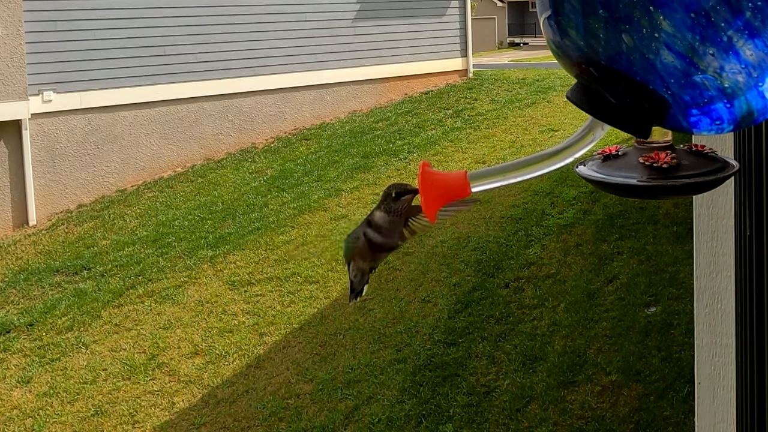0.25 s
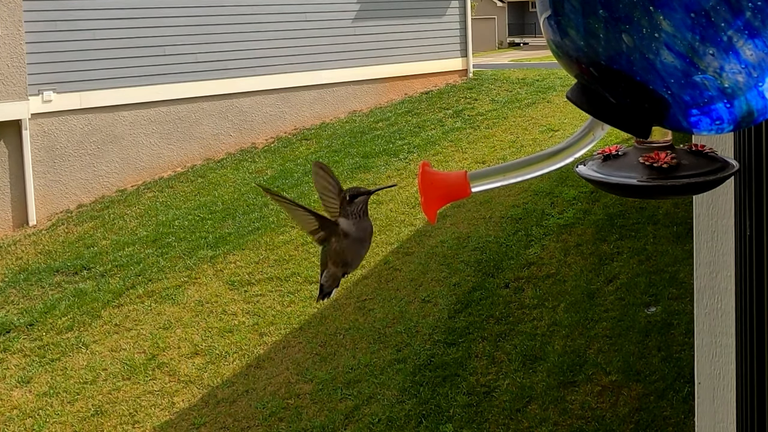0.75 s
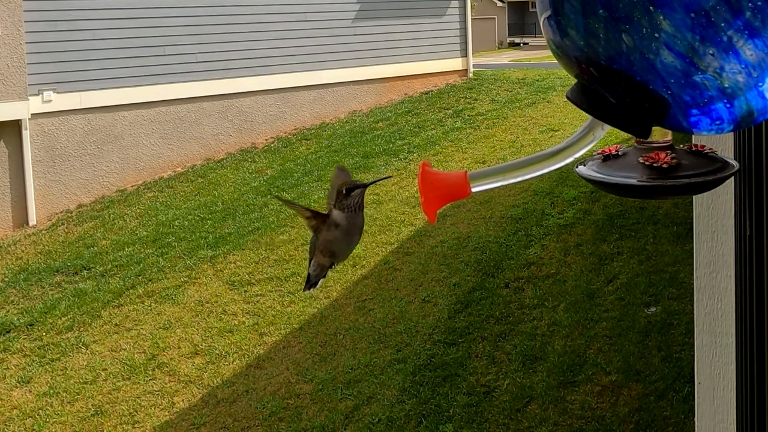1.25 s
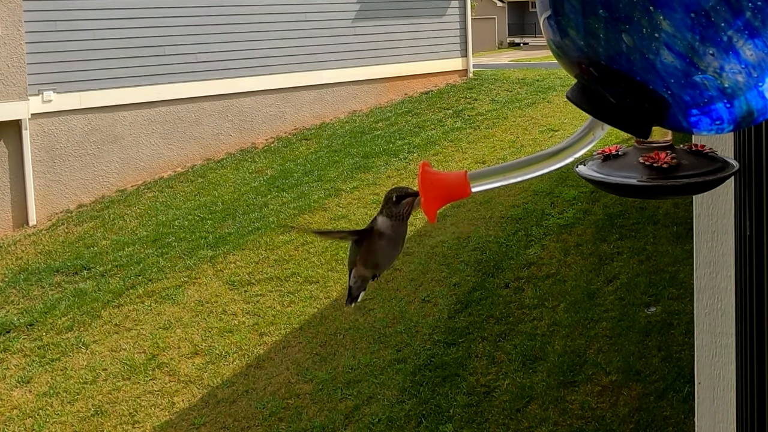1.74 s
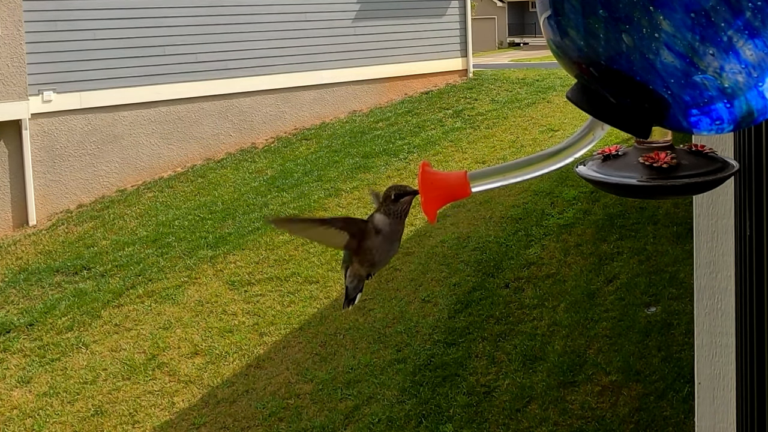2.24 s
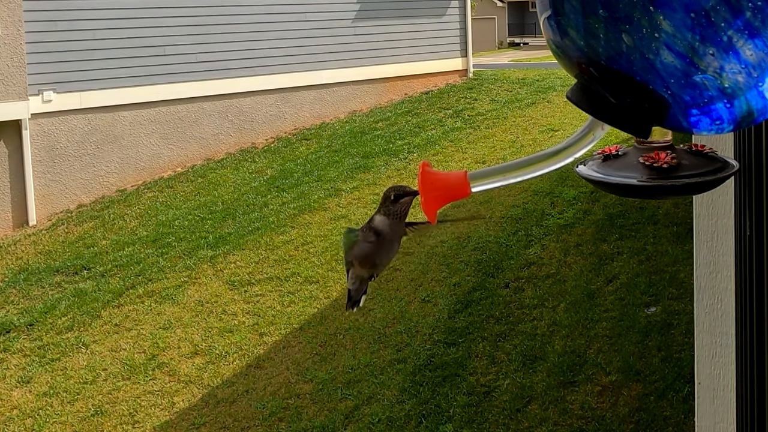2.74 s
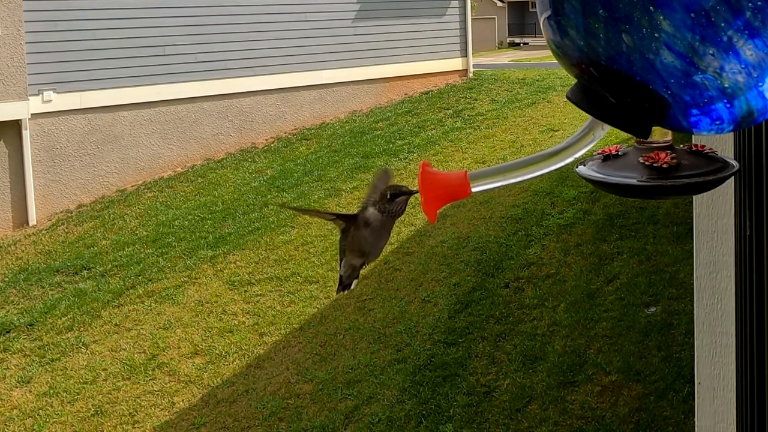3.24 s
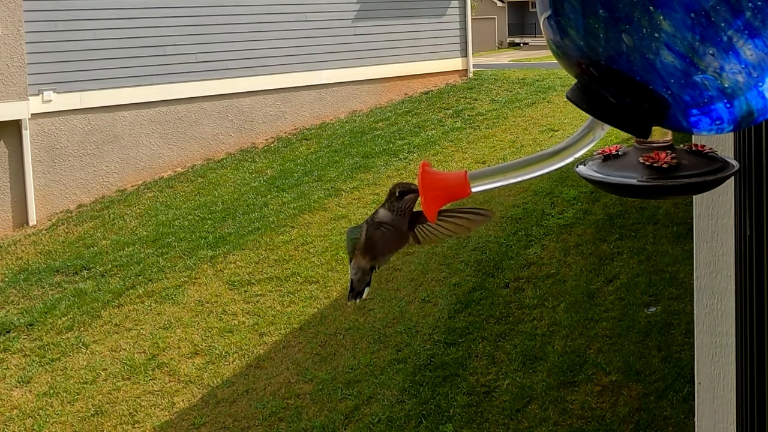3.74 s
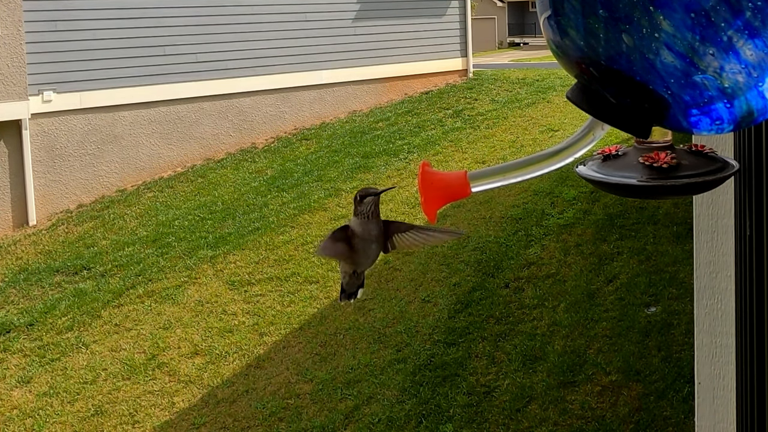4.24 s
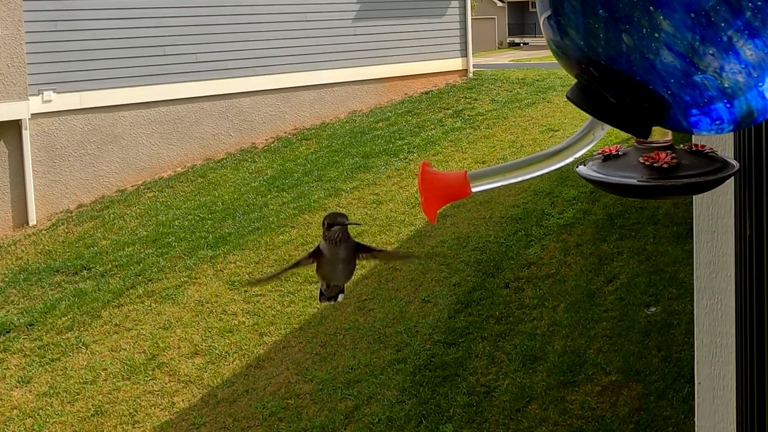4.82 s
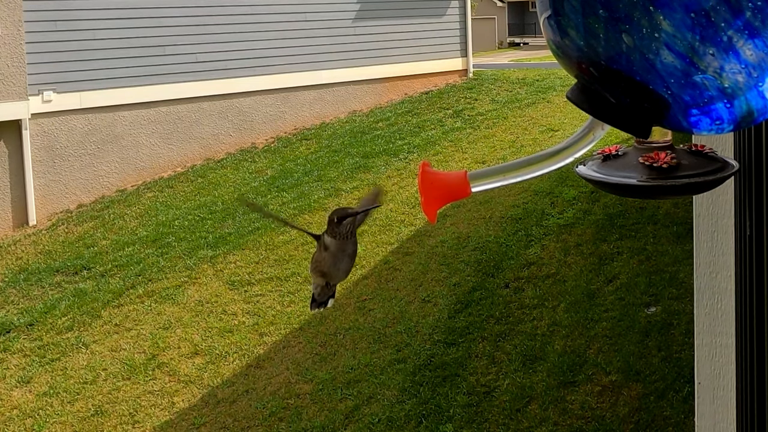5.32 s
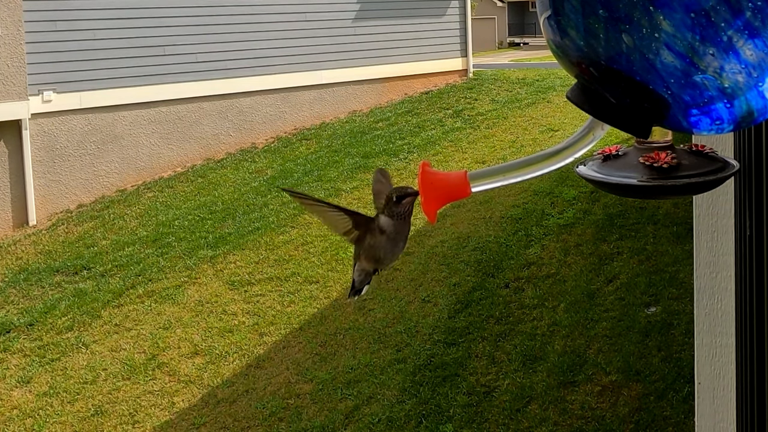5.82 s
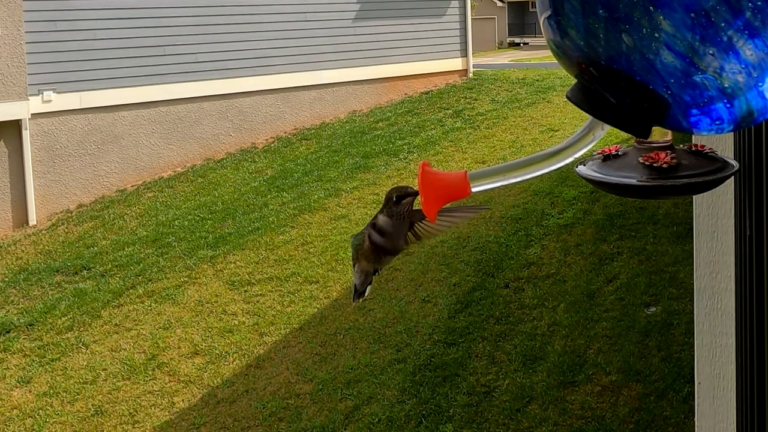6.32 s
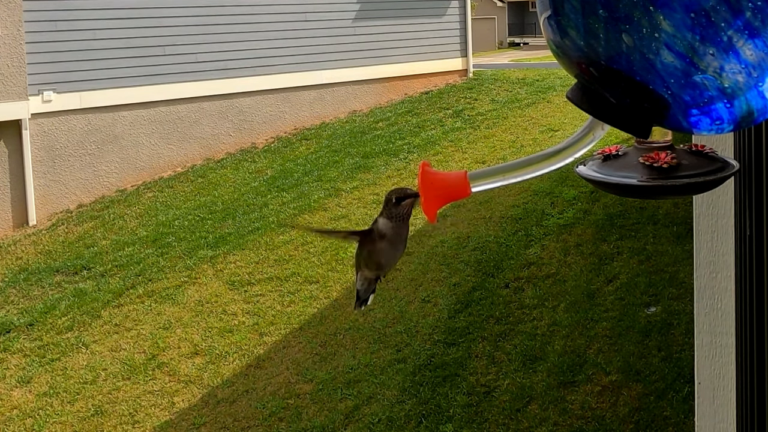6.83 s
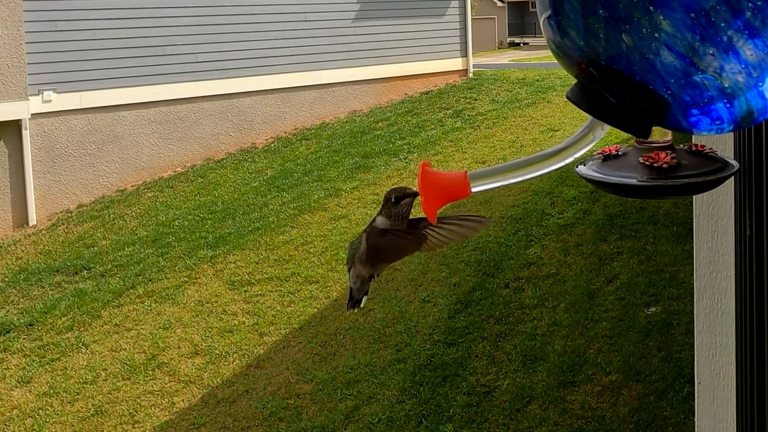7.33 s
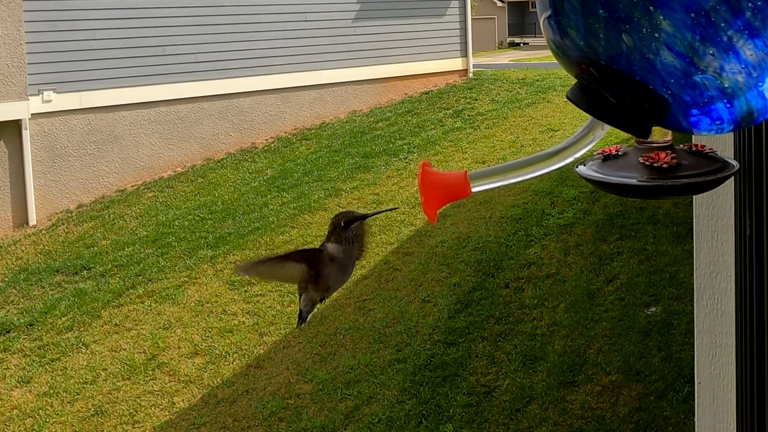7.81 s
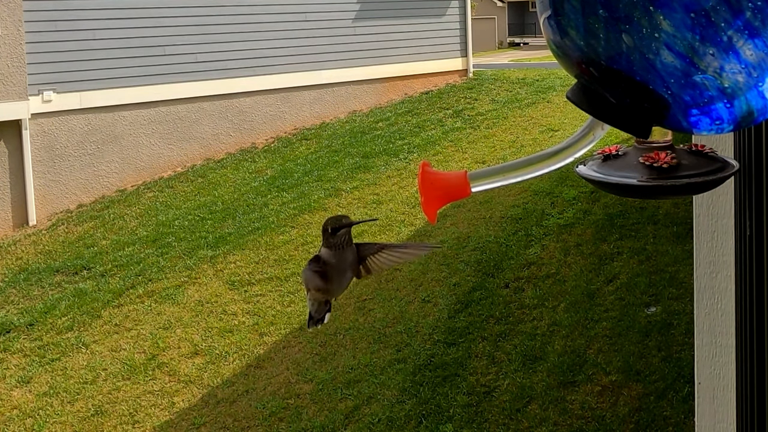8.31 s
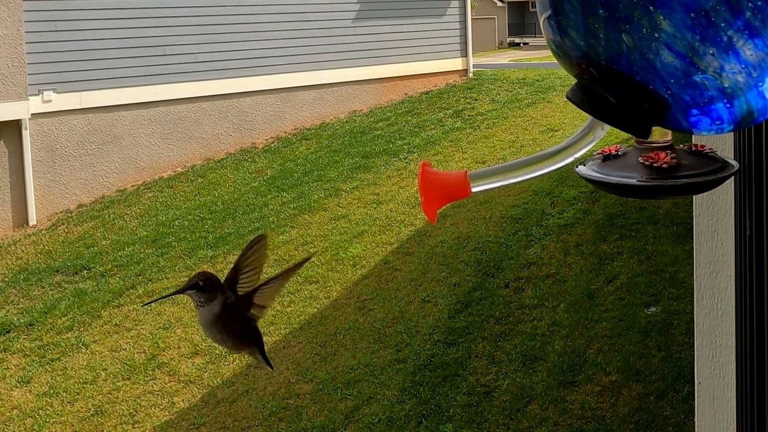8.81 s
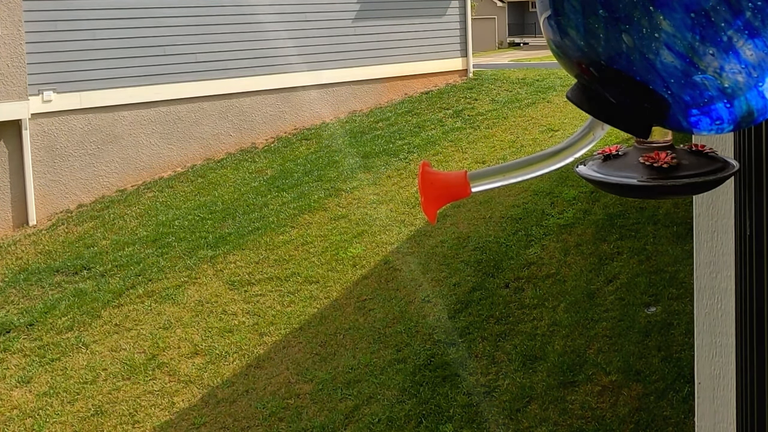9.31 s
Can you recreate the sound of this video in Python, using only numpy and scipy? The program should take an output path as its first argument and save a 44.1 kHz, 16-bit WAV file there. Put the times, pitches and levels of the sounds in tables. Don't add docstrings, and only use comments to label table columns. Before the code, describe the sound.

A hummingbird hovers close in an open backyard, its wings giving a deep, fluttering hum around fifty beats a second with a stronger octave above, wavering and briefly slackening, notably near 1.9 s. Sharp buzzy zips with a quick falling chip sound at 0, 2.1, 4, 6.1 and, faintest, 8.6 s. Low traffic rumble, thumping wind puffs, a shrill cicada wash and a faint steady fan whine surround it. A near cricket trills until 7.4 s and resumes at 8; another gives tiny high chirps in runs. Very soft dove coos come at 0.7, 1.8 and 2.5 s. A far engine swells from 2.5 to 4.3 s; another slows around 5.2-5.7. Faint katydid rasps begin at 4.7. Feathers rustle near 7.4 and 7.8. At 8.4-8.8 the wings speed up and surge, feathers rustle again at 8.9 as traffic peaks, and the hum vanishes by 9.3, leaving the yard.

```python
import sys
import numpy as np
from scipy import signal
from scipy.fft import rfft, irfft
from scipy.io import wavfile

SR = 44100
rng = np.random.default_rng(int(sys.argv[2]) if len(sys.argv) > 2 else 0)


def gain_from_decibels(decibels):
    exponent = np.asarray(decibels, float) / 20
    return 10 ** exponent


def master_out(mix):
    frames = np.transpose(np.atleast_2d(mix))
    ceiling = np.clip(frames, -1, 1)
    pcm = np.round(ceiling * 32767).astype(np.int16)
    wavfile.write(sys.argv[1], SR, pcm)


N = 421596
T = np.arange(N) / SR


def rms_one(x):
    return x / np.sqrt(np.mean(x ** 2) + 1e-20)


def in_time(rows):
    s, *columns = np.transpose(rows)
    return [np.interp(T, s, c) for c in columns]


def at_hz(points, hz):
    table_hz, value = np.array(points).T
    return np.interp(np.log(hz + 1), np.log(table_hz + 1), value)


def drift(rate_hz):
    knots = rng.standard_normal(int(N / SR * 40) + 2)
    r = np.exp(-2 * np.pi * rate_hz / 40)
    smooth = rms_one(signal.lfilter([1], [1, -2 * r, r * r], knots))
    return np.interp(T * 40, np.arange(len(knots)), smooth)


def sweep(hz):
    return 2 * np.pi * np.cumsum(hz) / SR


def place(x, pan_db, lead):
    early = np.interp(np.arange(N) + lead, np.arange(N), x)
    return np.array([early * gain_from_decibels(pan_db / 2), x * gain_from_decibels(-pan_db / 2)])


# frequency in Hz, left-right likeness from 0 to 1.
LIKENESS = [(60, 1), (130, 0.77), (290, 0.63), (640, 0.53), (1410, 0.39), (3100, 0.69), (6820, 0.01),
            (15000, 0.13)]
# frequency in Hz, left minus right in dB.
LEAN = [(30, -3), (70, -.8), (290, -.5), (700, -.2), (1400, -.7), (3000, -3), (6500, -2), (10000, 0),
        (13500, -3)]


def wash(spectrum, alike_scale, lead):
    hz = np.arange(N // 2 + 1) * SR / N
    mid, side = rfft(rng.standard_normal((2, N)))
    alike = np.clip(alike_scale * at_hz(LIKENESS, hz), 0, 1)
    mid, side = mid * np.sqrt(1 + alike), side * np.sqrt(1 - alike)
    lean = gain_from_decibels(at_hz(LEAN, hz) / 2)
    left = (mid + side) * lean * np.exp(2j * np.pi * hz * lead / SR)
    right = (mid - side) / lean
    return rms_one(irfft(gain_from_decibels(at_hz(spectrum, hz)) * [left, right], N))


def narrow(low_hz, high_hz, order=2):
    sos = signal.butter(order, [low_hz, high_hz], "band", fs=SR, output="sos")
    return rms_one(signal.sosfilt(sos, rng.standard_normal((2, N))))


def span(start, end, fade):
    return np.clip(np.minimum(T - start, end - T) / fade, 0, 1)


def bursts(events, rise, hold, fall):
    out = np.zeros(N)
    for s, db in events:
        age = T - s
        out += gain_from_decibels(db) * np.clip(age / rise, 0, 1) * np.exp(-np.clip(age - hold, 0, None) / fall)
    return out


def bumps(events, width):
    return sum(size * np.exp(-((T - s) / width) ** 2) for s, size in events)


# time in seconds, beats in Hz, lift in dB, how far the bird is turned face-on from 0 to 1.
WING_BEAT = [(0.0,50.6,-24.5,0.84), (0.23,49.82,-26,0.2), (1.22,48.3,-27,0.31), (1.53,50.44,-25.5,0.36),
             (2.72,49.0,-26,0.43), (3.55,51.25,-25.5,0.76), (4.47,50.17,-25.5,0.46),
             (4.63,55.17,-21.5,0.75), (5.42,50.2,-25,.6), (5.67,55.0,-23,0.57), (6.86,50.86,-23.5,0.46),
             (8.13,50.2,-26,.1), (8.26,50.73,-29,0.32), (8.37,57.48,-24.5,0.9), (8.65,53.53,-21.5,0.77),
             (8.75,57.56,-16.5,0.79), (8.91,51.1,-21.5,0.08), (9.3,55.8,-37,0.0)]
# centre in seconds, level lost in dB.
FALTERS = [(1.86, 19), (2.36, 3), (3.0, 1.5), (4.18, 7), (4.5, 4), (5.75, 3.5), (6.62, 2.5), (7.0, 4.5),
           (7.62, 2.5), (8.05, 3), (8.85, 5.5)]
# multiple of the beat, level in dB, change in dB when face-on.
OVERTONES = [(3, 1, 5), (5, 1.5, 1), (6, -6, -8), (7, -6, 6), (8, -7.5, 4), (9, -13, 6), (10, -17, 4),
             (11, -23, 4), (12, -27, 4)]


def wings():
    beat_hz, lift_db, face = in_time(WING_BEAT)
    mean_db = lift_db.mean()
    slack_db = bumps(FALTERS, .081)
    turn = sweep(beat_hz * (1 + .002 * drift(6.0)))
    first_db = lift_db - slack_db - 9.5 + 7.5 * face + 2.5 * drift(6.2)
    second_db = lift_db - slack_db + 1.64 * drift(7.1)
    fourth_db = mean_db - 4 - 11.5 * face + 2.37 * drift(5.3)
    hum = gain_from_decibels(first_db) * np.sin(turn)
    hum += gain_from_decibels(second_db) * np.cos(2 * turn)
    hum += gain_from_decibels(fourth_db) * np.cos(4 * turn + 1)
    over_db = mean_db - 12.5 + .27 * (lift_db - mean_db) - slack_db
    for k, db, turn_db in OVERTONES:
        level_db = over_db + db + turn_db * (face - .5) + 1.64 * drift(5.3)
        hum += gain_from_decibels(level_db) * np.sin(k * turn + k)
    return place(np.sqrt(2) * hum * span(-1, 9.32, .1), -.6, 4)


# frequency in Hz, level in dB per Hz.
WIND_COLOUR = [(6, -10), (12, -4), (22, 0), (42, 1.5), (55, 3.5), (76, 3), (86, -11), (120, -40),
               (400, -120)]
# centre in seconds, peak in dB.
GUSTS = [(0.0, -33), (0.48, -40), (0.85, -43), (1.4, -43), (2.12, -34), (2.45, -46), (3.05, -30),
         (3.3, -32), (3.7, -29.5), (4.079, -29.5), (4.5, -36), (4.93, -31.5), (5.35, -36), (5.53, -29),
         (5.87, -30), (6.22, -39), (6.49, -25), (6.7, -36), (7.07, -36), (7.39, -39), (7.88, -46),
         (8.2, -29), (8.521, -31.5), (8.78, -30), (9.5, -38)]


def wind():
    breeze_db, gust_s = -40, .089
    strength = gain_from_decibels(breeze_db) + bumps([(s, gain_from_decibels(db)) for s, db in GUSTS], gust_s)
    return gain_from_decibels(5.5) * strength * gain_from_decibels([[-1], [1]]) * wash(WIND_COLOUR, .78, 4.0)


# time in seconds, rumble in dB.
TRAFFIC = [
    (0, -26.5),
    (2.0, -26),
    (2.9, -26.5),
    (4.4, -26),
    (6.5, -26),
    (8.0, -24),
    (8.5, -24),
    (9.0, -21.5),
    (9.15, -25),
    (9.56, -27),
]
# frequency in Hz, level in dB per Hz.
RUMBLE_COLOUR = [(50, -50), (88, -4), (105, -1.5), (141, -4), (196, -1.5), (253, -11), (292, -14),
                 (370, -14), (520, -26.5), (700, -32.5), (1500, -110)]
# frequency in Hz, level in dB per Hz.
HISS_COLOUR = [(290, -50), (500, 0), (565, -10.5), (784, -9), (1170, -2.5), (1280, -6), (1310, -4),
               (2100, -13), (4010, -19.5), (4700, -18), (6110, -45), (10300, -120)]


def traffic():
    rumble_db, = in_time(TRAFFIC)
    hiss_db = -40 + .067 * (rumble_db - rumble_db.mean()) + 1.2 * drift(3.4)
    rumble = gain_from_decibels(rumble_db - .5) * wash(RUMBLE_COLOUR, 1.28, 9.6)
    return rumble + gain_from_decibels(hiss_db) * wash(HISS_COLOUR, 1.14, 2.6)


# frequency in Hz, level in dB per Hz.
CICADA_COLOUR = [(2470, -72), (4200, -63), (4680, -9.5), (4910, -19), (5340, -8), (5730, -7), (6480, 2),
                 (6780, 6.5), (7240, 4), (7660, -3.5), (8300, -20), (10800, -65), (18300, -120)]
# frequency in Hz, level in dB per Hz.
AIR_COLOUR = [(5000, -45), (8200, 0), (8700, -1), (9300, -1), (9700, -9), (10200, -13), (10500, -10),
              (11200, -9), (13500, -10), (14300, -17), (14600, -30), (15500, -45)]
# time in seconds, level in dB.
AIR_LEVEL = [
    (0, -55.5),
    (2, -55.5),
    (4.0, -56.5),
    (4.1, -57.5),
    (6, -57),
    (8.5, -56.5),
    (8.98, -54),
    (9.03, -65),
    (9.56, -71),
]


def cicadas():
    fade_db_per_s = .0739
    chorus_db = -38 + 3.5 - fade_db_per_s * T + .29 * drift(12.0)
    chorus = gain_from_decibels(chorus_db) * wash(CICADA_COLOUR, 1.1, 5.75)
    shimmer = gain_from_decibels(in_time(AIR_LEVEL)[0]) * wash(AIR_COLOUR, 1.7, 5.0)
    hiss = gain_from_decibels(-68.5) * gain_from_decibels([[-1.5], [1.5]]) * narrow(10300, 13700, order=4)
    return chorus + shimmer + hiss


FAN_HZ = [1244.5, 1362, 1422, 1540, 1957, 652, 771]
FAN_DB = [-49, -64, -63, -63, -70, -67, -68]


def fan():
    lines = np.zeros(N)
    for hz, db in zip(FAN_HZ, FAN_DB):
        lines += gain_from_decibels(db + 1.6 * drift(4.5)) * np.sin(2 * np.pi * hz * T + hz)
    return place(np.sqrt(2) * gain_from_decibels(.9) * lines, -.55, .55)


# start in seconds, end in seconds, pulses per second.
TRILLS = [
    (-.0045, 7.44, 47.985),
    (7.9587, 9.5, 47.9),
]


def trill():
    out = np.zeros(N)
    for start, end, rate in TRILLS:
        beats = (T - start) * rate
        part = np.minimum(beats % 1 / .52, 1)
        hz = 7630 + 125 * np.tanh(7 * (.5 - part))
        fresh = rng.uniform(0, 2 * np.pi, 600)[beats.astype(int)]
        shape = np.sin(np.pi * part) ** .4 * span(start, end, .01)
        out += gain_from_decibels(-43 + 1.4 * drift(10.0)) * shape * np.sin(sweep(hz) + fresh)
    echo = gain_from_decibels(-6) * np.roll(out, 230) - gain_from_decibels(-12) * np.roll(out, 470)
    return 2 * place(out, -2.4, 4.9) + 2 * place(echo, 1.9, -34.5)


# pitch in Hz, width in Hz, pulses per second, level in dB, pan in dB,
# list of songs as start and end in seconds.
SONGS = [
    (5000, 230, 40, -54, -2.5, [(-.1, 1.17), (1.68, 3.48), (4.25, 9.7)]),
    (9250, 250, 59.5, -59, -2.5, [(-.1, .65)]),
    (8420, 170, 59, -64, -1.5, [(.3, 4.05)]),
]


def far_crickets():
    out = np.zeros((2, N))
    for hz, width_hz, rate, db, pan_db, songs in SONGS:
        singing = sum(span(*song, .05) for song in songs)
        throb = (1 + .5 * np.sin(2 * np.pi * rate * T)) * singing
        pan = gain_from_decibels([[pan_db / 2], [-pan_db / 2]])
        out += gain_from_decibels(db) * pan * narrow(hz - width_hz / 2, hz + width_hz / 2) * throb
    return out


# start in seconds, peak in dB, low edge of the buzz in Hz.
ZIPS = [
    (.028, -32.5, 5400),
    (2.081, -32.5, 5370),
    (4.028, -36, 5323),
    (6.09, -35, 5400),
    (8.58, -37.5, 5300),
]


def zips():
    buzz = 1 + .5 * np.sin(2 * np.pi * 240 * T)
    out = np.zeros((2, N))
    for s, db, low_hz in ZIPS:
        fall_hz = low_hz + 350 + 900 * np.exp(-np.clip(T - s, 0, 1) / .004)
        chip = bursts([(s, db - 7)], .002, .014, .004) * np.sin(sweep(fall_hz))
        note = bursts([(s, db - 2.5)], .003, .038, .01) * buzz
        tail = bursts([(s, db - 7.5)], .0091, .11, .11)
        rasp = narrow(low_hz, 7900, order=6)
        octave = gain_from_decibels(-27) * narrow(10800, 13600, order=6)
        out += chip + (note + tail) * (rasp + octave)
    return out * gain_from_decibels([[-1.5], [1.5]])


# start in seconds, gap in seconds, count of chirps.
CHIRPS = [(.122, .219, 3), (.811, .262, 3), (1.531, .235, 4), (2.497, .226, 4), (3.431, .266, 4),
          (4.471, .257, 4), (5.441, .228, 3), (6.165, .274, 2), (6.653, .268, 3), (7.922, .252, 2),
          (8.366, .233, 3)]


def chirping_cricket():
    chirps = [(s + gap * k, -51) for s, gap, count in CHIRPS for k in range(count)]
    tone = np.sin(2 * np.pi * 8855 * T) * gain_from_decibels(1.5 * drift(9.0) + 1)
    return place(bursts(chirps, .008, .035, .008) * tone, 3, 2.5)


# start in seconds, end in seconds, then start, middle and end pitch in Hz, level in dB.
GLIDES = [
    (0.66, 1.124, 508, 520, 496, -47),
    (1.795, 2.026, 508, 527, 535.6, -45),
    (2.53, 2.895, 508, 501, 520, -43),
    (5.204, 5.702, 153, 144.5, 128, -32),
]
# time in seconds, firing tone in Hz, level in dB.
ENGINE = [
    (2.5, 113, -45),
    (2.7, 115.5, -29),
    (3.1, 119.5, -24),
    (3.45, 121.5, -21),
    (3.8, 122, -21),
    (4.05, 119, -23),
    (4.15, 116.5, -28),
    (4.3, 114, -55),
]


def dove_and_engines():
    tone = np.zeros(N)
    for start, end, *glide_hz, db in GLIDES:
        hz = np.interp(T, [start, (start + end) / 2, end], glide_hz)
        tone += gain_from_decibels(db) * span(start, end, .058) * np.sin(sweep(hz))
    firing_hz, db = in_time(ENGINE)
    tone += gain_from_decibels(db + 1 + drift(5)) * np.sin(sweep(firing_hz)) * span(2.45, 4.35, .05)
    return place(np.sqrt(2) * tone, -1.7, 3.3)


# start in seconds, count of rasps, peak in dB.
RASPS = [
    (4.655, 1, -54),
    (4.97, 3, -54),
    (5.44, 1, -50),
    (5.82, 7, -54),
    (6.71, 6, -56),
    (7.545, 3, -56),
    (7.93, 8, -52),
    (8.915, 5, -52),
]


def katydid():
    gap_s = .129
    rasps = [(s + gap_s * k, db) for s, count, db in RASPS for k in range(count)]
    rasp = bursts(rasps, .012, .06, .008) * narrow(8950, 9550, order=4) * gain_from_decibels(-5)
    return rasp * gain_from_decibels([[-2.5], [1.5]])


# start in seconds, level in dB.
RUSTLES = [
    (7.4, -47),
    (7.78, -50),
    (8.72, -75),
    (8.9, -50),
    (8.984, -47),
]


def feathers():
    return bursts(RUSTLES, .003, .014, .042) * narrow(2800, 3100)


def scene():
    bird = wings() + zips() + feathers()
    yard = wind() + traffic() + fan() + dove_and_engines()
    insects = cicadas() + trill() + far_crickets() + chirping_cricket() + katydid()
    return bird + yard + insects


def roll_off(x):
    return signal.sosfilt(signal.butter(12, 15610, fs=SR, output="sos"), x)


def record(dry):
    return roll_off(dry)


dry = scene()
out = record(dry)
master_out(out)
```